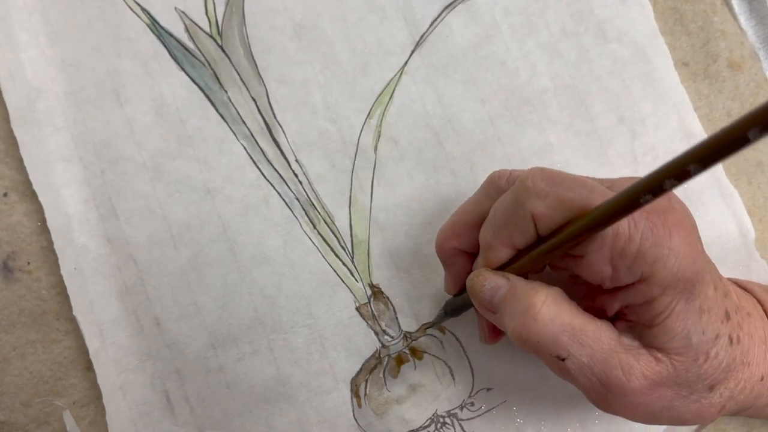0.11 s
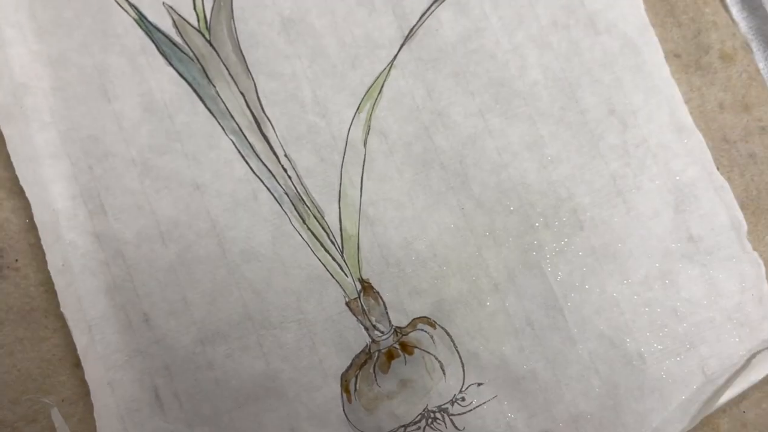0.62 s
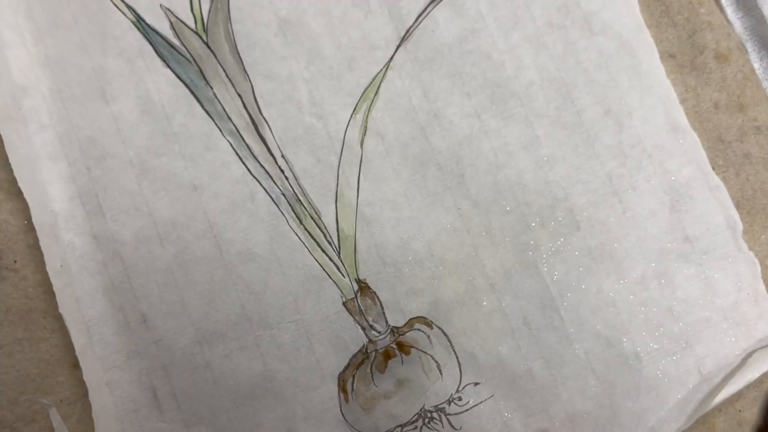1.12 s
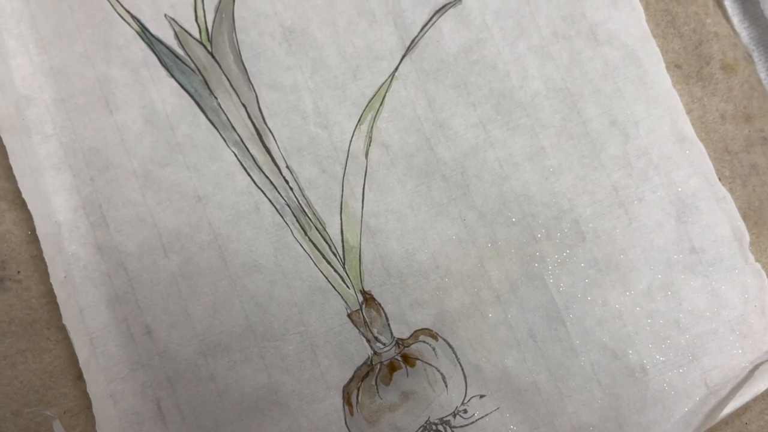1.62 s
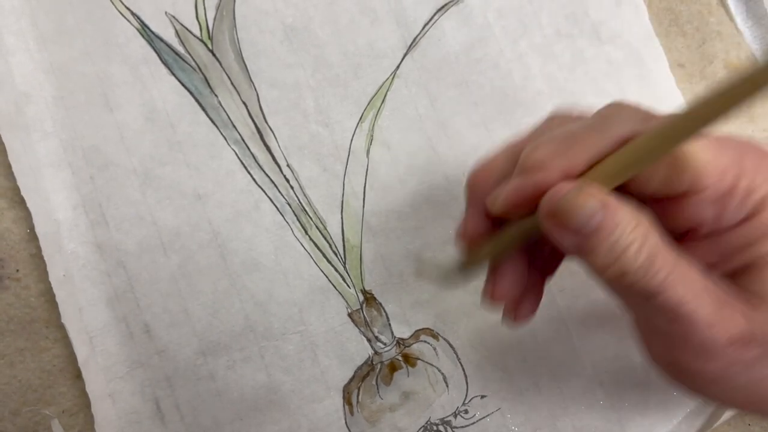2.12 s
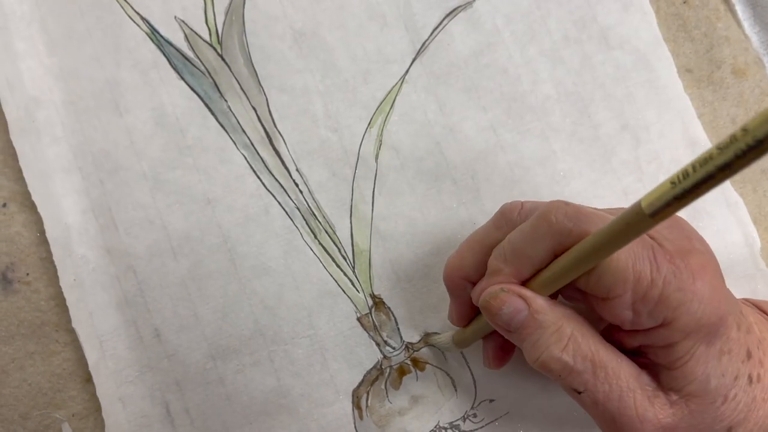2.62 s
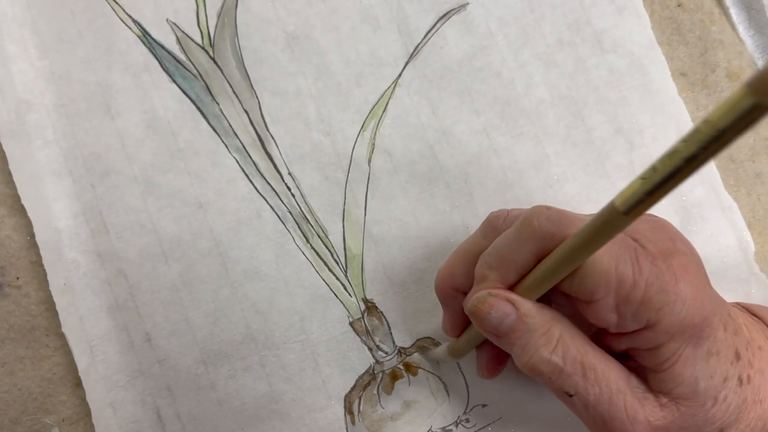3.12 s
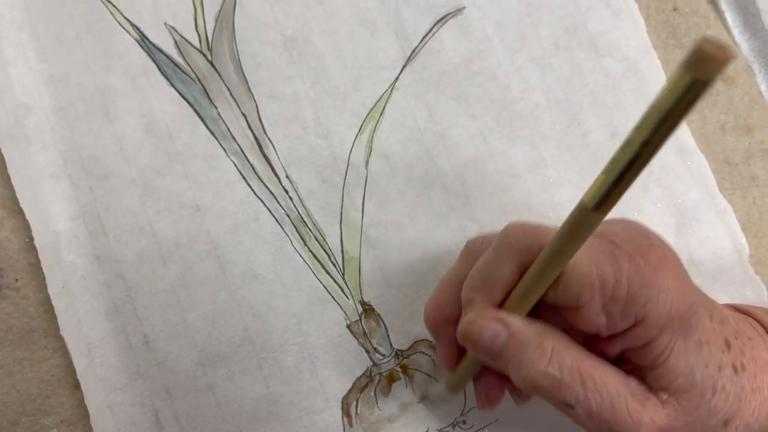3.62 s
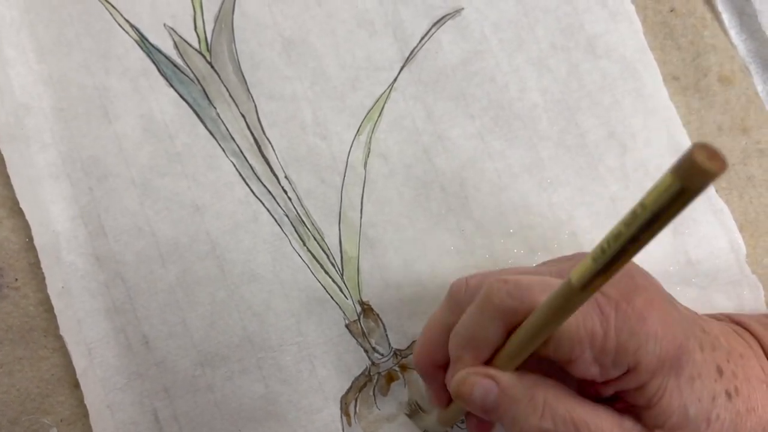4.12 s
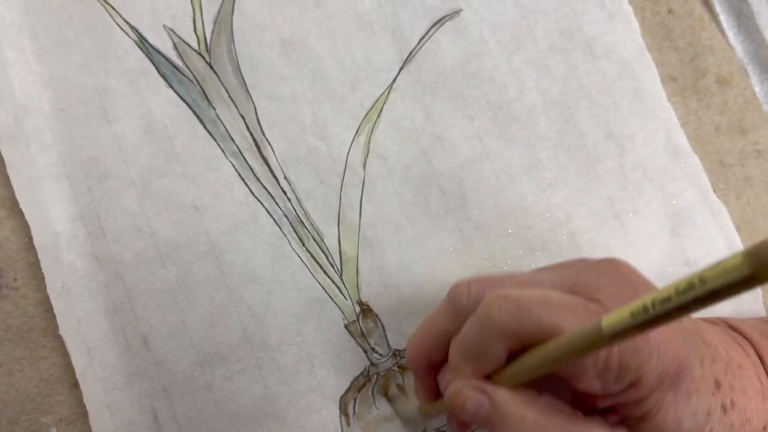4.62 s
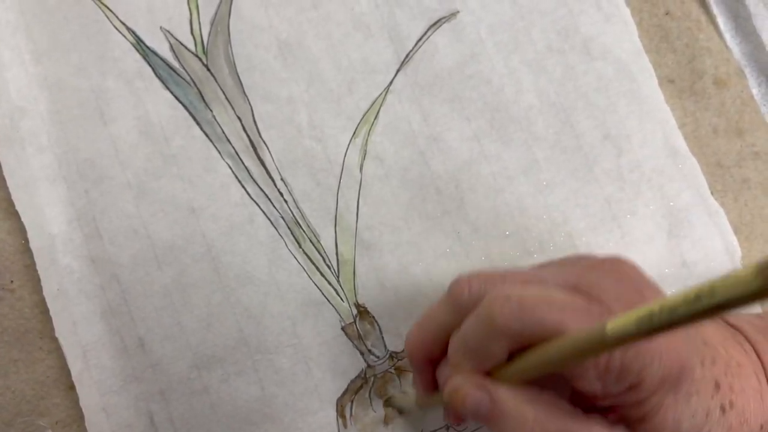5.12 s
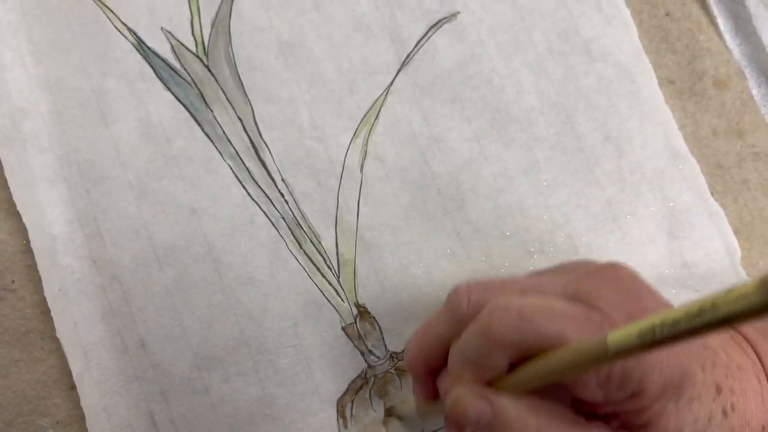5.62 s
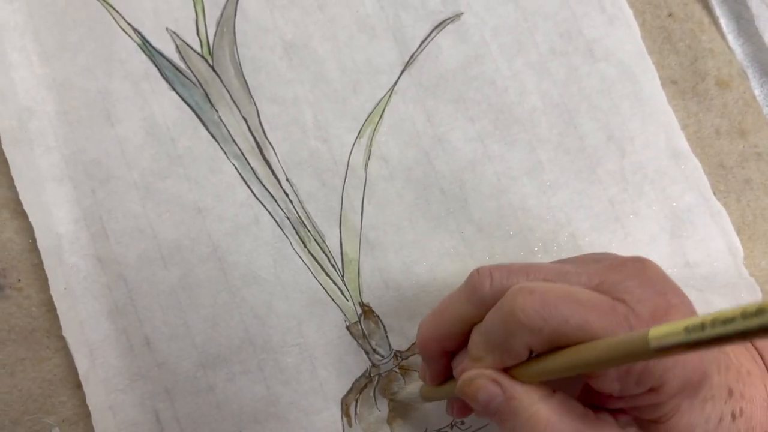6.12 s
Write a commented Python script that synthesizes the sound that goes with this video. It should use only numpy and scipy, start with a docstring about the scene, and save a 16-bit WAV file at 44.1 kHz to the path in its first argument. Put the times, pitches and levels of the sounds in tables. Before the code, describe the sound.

Close, quiet paper rubbing and bristle strokes over a faint low drone, interrupted early by a sharp clack of wooden brush handles.

```python
"""A quiet room with a low distant drone, at a table covered with paper.
A wooden brush handle drops among others and clatters: rough contacts ring wood and table modes.
Before, during and after the clatter a soft brush dabs and scrubs the paper while the hand slides along:
coloured noise in swelling strokes. Heard close by a small camera whose two microphone ports turn the
treble against each other."""
import sys
import numpy as np
from scipy import signal
from scipy.fft import rfft, irfft, next_fast_len
from scipy.io import wavfile
from scipy.ndimage import uniform_filter1d

SR = 44100
rng = np.random.default_rng(int(sys.argv[2]) if len(sys.argv) > 2 else 0)


def makeup_ratio(level_db):
    """Linear amplitude ratio for a level in decibels (20 dB per factor of ten)."""
    decades = np.asarray(level_db, float) / 20
    return 10 ** decades


def to_wav(sig):
    """Store sig (one row per channel, or 1-D mono) as 16-bit WAV at the path in sys.argv[1].

    Samples outside -1..1 are clipped; the rate is SR.
    """
    pcm = np.clip(np.atleast_2d(sig), -1, 1) * 32767
    pcm = np.round(pcm).astype(np.int16)
    wavfile.write(sys.argv[1], SR, pcm.T)  # frames by channels


N = 275889

# spectrum shape of the room air: (frequency [Hz], density [dB per Hz])
ROOM_AIR = [(15, -37), (25, -2), (71, 3), (436, -23.5), (1000, -26), (1770, -19.5), (2620, -28.5),
            (7200, -35), (8640, -25), (9340, -31.5), (10100, -37.5), (11200, -31), (12400, -52),
            (16200, -76), (22000, -120)]
# how fast each band of the echo dies: (frequency [Hz], t60 [s])
ECHO_DECAY = [(150, 0.73), (600, 0.62), (2500, 0.31), (8000, 0.17), (12000, 0.048)]
# arm and sleeve shifting on the table: (middle [s], length [s], level [dB])
ARM_BUMPS = [(0.276, 0.346, -56), (0.803, 0.876, -61.5), (1.531, 0.457, -59.5), (1.931, 0.226, -60.5),
             (2.145, 0.253, -55), (2.914, 0.065, -59.5), (3.484, 0.5, -68.5), (4.9, 0.385, -67),
             (5.32, 0.312, -63.5), (5.952, 0.227, -65.5)]
# distant drone: (time [s], level [dB], level of the fifth above [dB])
DRONE_LEVELS = [(0.0, -69, -71.5), (0.72, -68.5, -68.5), (0.85, -54, -55.5), (1.34, -67, -79.5),
                (1.98, -54.5, -67.5), (2.39, -65, -66), (2.6, -52.5, -77), (2.69, -61.5, -66.5),
                (3.17, -48.5, -56.5), (3.22, -54, -75.5), (3.45, -55.5, -55.5), (3.68, -60, -69),
                (4.2, -81, -74), (4.5, -100, -100)]
# low hum beside the drone: (time [s], frequency [Hz], level [dB])
LOW_HUM = [(0.0, 57, -67.5), (0.89, 56.1, -60.5), (1.34, 54.8, -62.5), (4.74, 56.05, -68),
           (4.93, 62.43, -60), (5.92, 60.95, -61.5), (6.12, 58.53, -49.5), (6.19, 58.6, -68),
           (6.26, 60.8, -66)]
# the hand lands on the sheet: (time [s], starting level [dB], t60 [s], centre [Hz])
SCUFFS = [(.695, -56, 0.084, 1698), (2.168, -58.5, .2, 1300), (2.895, -58.5, .1, 598),
          (4.415, -57.5, 0.27, 800), (5.917, -52, 0.141, 1087), (6.01, -55, 0.168, 1002),
          (6.127, -62, .22, 800)]
# fingertip taps on the sheet: (time [s], peak [dB], pitch [Hz])
TAPS = [(.192, -46.5, 1150), (.697, -38.5, 1675), (1.413, -53.5, 1440), (1.529, -38, 1720),
        (2.19, -36.5, 1788), (2.2109, -35, 1630), (2.3336, -36.5, 1408), (2.344, -42.5, 1750),
        (3.423, -41.5, 1670), (3.721, -46, 1480), (4.231, -47, 950), (4.241, -44, 1440), (4.688, -48, 1850),
        (5.9, -50.5, 1740)]
# table top modes: (frequency [Hz], relative level [dB], t60 [s])
TABLE_MODES = [(133.5, -15, 0.2), (218, -5.5, 0.094), (336.5, 1.5, .06), (430.2, -1.5, 0.0447),
               (523.1, -0.5, .05), (648.8, -1, .045), (800, -4.5, .04), (1022, -10.5, 0.02)]
# the table answers the knocks: (time [s], peak [dB])
THUDS = [(.8406, -29), (.8428, -24), (.8714, -30.5), (0.8787, -37), (.888, -32.5), (.903, -37), (.924, -34)]
# wooden handle modes: (frequency [Hz], relative level [dB], t60 [s])
HANDLE_MODES = [(1150, -12.5, .01), (1523, -10, .015), (1850, -10.5, 0.0072), (2415, -5.5, 0.01638),
                (3065, -6.5, 0.011), (3593, -5, .009), (4413, -0.5, 0.014), (5050, -8, .007),
                (5694, -11, 0.0055), (6770, -9, 0.014), (8175, 1, 0.0059), (9300, 0.5, 0.0045),
                (10357, 2.48, 0.0059), (11215, -2, 0.0058), (12600, -10, 0.0032)]
# loose handles chatter, one row: (start [s], end [s], tick rate [1/s], tick level [dB],
# fading [dB/s], low modes against high [dB])
RATTLE = (.839, 0.9155, 2500, -33, 142, -5.5)
# handle knocks: (time [s], peak of the high modes [dB], brightest frequency [Hz],
# peak of the low modes against the high [dB])
KNOCKS = [(.613, -47, 8340, -26.5), (0.8371, -2, 8720, -25), (0.8381, -2, 8700, -22.5),
          (0.8406, 2, 9300, -20.5), (0.8421, -4, 10990, -19), (0.8433, -7, 9600, -13),
          (0.8454, -16, 10990, -4.5), (0.8506, -16.5, 9500, -11.5), (0.8711, -3, 10500, -19),
          (0.8749, -4, 10490, -16), (0.8786, -9.5, 7683, -11), (0.8875, -15.5, 9520, -6),
          (0.8902, -22, 7710, -4), (0.9015, -20, 7920, -13), (0.9063, -26, 7850, -12.5),
          (0.9167, -26.5, 7960, -10.5), (0.9233, -26.5, 8300, -3), (0.9277, -30, 6900, -6),
          (1.095, -36, 10900, -15), (1.102, -28.5, 6795, -10), (1.282, -40, 8050, -11.5),
          (1.6237, -33, 11000, -28), (5.863, -29.5, 10070, -22.5), (6.091, -45.5, 10480, -20)]
# spectrum shape of the bristle hiss: (frequency [Hz], density [dB per Hz])
BRISTLE_HISS = [(1800, -20.5), (2800, -6.5), (4000, -7.5), (6000, -8.5), (7500, -8.5), (9000, -3),
                (10200, -1), (11300, -2.5), (12000, -20.5), (12800, -34.5)]
# resonance of the sheet, one row: (centre [Hz], width [Hz])
SHEET_RESONANCE = (1622, 1202)
# resonance of the table under the hand, one row: (centre [Hz], width [Hz])
PALM_RESONANCE = (808.2, 530)
# brush strokes: (middle [s], length [s], bristle hiss [dB], sheet rustle [dB], palm drag [dB])
STROKES = [(0.094, 0.099, -66, -65, -79.5), (0.199, 0.215, -62.5, -62.5, -72.5),
           (0.323, .1, -67.5, -66, -70), (0.473, 0.155, -68.5, -69.5, -62.5),
           (0.634, 0.08, -61.5, -73.5, -61.5), (0.714, 0.112, -64, -61, -66),
           (0.821, 0.182, -61.5, -59, -56.5), (0.961, 0.237, -62.5, -60.5, -64.5),
           (1.101, 0.1286, -58.5, -61, -64.5), (1.188, 0.065, -64.5, -71.5, -64.5),
           (1.272, 0.123, -61.5, -67.5, -65), (1.368, 0.118, -71.5, -75.5, -80.5),
           (1.465, 0.159, -60.5, -55.5, -64.5), (1.555, 0.126, -57, -59.5, -59.5),
           (1.623, 0.159, -53.5, -65.5, -71.5), (1.759, 0.24, -57.5, -62, -68),
           (1.848, 0.147, -60, -74.5, -80), (1.936, 0.185, -76, -66, -68.5),
           (2.076, .07, -68, -84.5, -76.5), (2.216, 0.1305, -58.5, -61.5, -60.5),
           (2.275, 0.124, -62, -61, -65.5), (2.353, 0.169, -59, -58, -65.5),
           (2.498, 0.243, -63.5, -60.5, -67), (2.663, 0.165, -66.5, -64.5, -74),
           (2.806, 0.141, -61, -62.5, -76.5), (2.873, 0.124, -51.5, -51.5, -63),
           (3.012, 0.127, -61.5, -60, -69.5), (3.183, 0.2, -56.5, -57.5, -76),
           (3.292, 0.165, -57.5, -59.5, -69), (3.453, 0.1696, -54.5, -55, -59),
           (3.612, 0.1016, -54, -54.5, -75), (3.751, 0.1407, -54, -56, -72.5),
           (3.889, 0.082, -56, -56.5, -84), (4.018, 0.1295, -50, -53.5, -74.5),
           (4.152, 0.144, -56, -56.5, -81), (4.283, 0.1715, -53.5, -52, -64.5),
           (4.437, 0.1193, -57, -52.5, -63.5), (4.566, 0.1475, -53.5, -56, -68),
           (4.723, 0.108, -54.5, -56, -67), (4.863, 0.1814, -52, -52.5, -63),
           (4.985, 0.173, -53, -51.5, -54.5), (5.153, 0.1795, -50.5, -52.5, -56.5),
           (5.271, 0.1395, -53, -51, -50.5), (5.392, 0.1156, -50, -51.5, -53.5),
           (5.509, 0.108, -54, -52, -56), (5.628, 0.107, -50.5, -54, -66), (5.745, 0.1093, -55, -58.5, -67),
           (5.937, 0.0824, -69.5, -67, -62), (6.036, 0.078, -61.5, -60.5, -58.5),
           (6.153, 0.198, -62.5, -65.5, -63), (6.26, 0.151, -54, -58, -61.5)]
# swishes of the finest hiss alone: (middle [s], length [s], level before the fine hiss boost [dB])
SWISHES = [(0.471, 0.168, -67.5), (0.623, 0.0575, -58), (1.097, 0.0775, -58), (1.197, 0.057, -64.5),
           (1.589, 0.084, -62), (1.636, 0.0726, -49), (1.776, .16, -56.5), (2.076, .06, -70.5),
           (5.89, .1, -67.5)]
# microphone ports: (frequency [Hz], likeness [0-1], lead of the right [rad], left over right [dB])
PORTS = [(60, .94, 0, 3.6), (300, .65, 0, 1.2), (1400, .35, .3, .5), (2300, .6, -.7, 3),
         (4000, .75, -.6, 3), (6000, .45, -.5, 2.5), (7200, .6, -.6, 2.5), (8000, 1, -.6, .4),
         (8600, 1, .1, 0), (10250, 1, 3.14, 0), (11500, 1, 5.9, 0), (11900, 1, 6.28, 0)]


def evened(x):
    """Scales to rms 1."""
    return x / np.sqrt(np.mean(x ** 2) + 1e-30)


def read(points, hz):
    """Columns of a table at the given frequencies, joined on a log frequency axis."""
    f, *columns = np.transpose(points)
    return [np.interp(np.log(hz + 1), np.log(f + 1), c) for c in columns]


def follow(rows):
    """Columns of a time curve at every sample."""
    s, *columns = np.transpose(rows)
    return [np.interp(np.arange(N) / SR, s, c) for c in columns]


def colour(x, gain):
    """Filters by a gain given as a function of frequency."""
    size = next_fast_len(N + 4096)
    return irfft(rfft(x, size) * gain(np.fft.rfftfreq(size, 1 / SR)), size)[..., :N]


def hump(centre_hz, width_hz, steep):
    """Gain curve of a resonance."""
    return lambda hz: (1 + ((hz - centre_hz ** 2 / (hz + 1)) / width_hz) ** 2) ** -steep


def grit(per_s, spread_db, patchy_db):
    """Noise with dense snags of uneven size, shared by both sound paths, in drifting patches of colour."""
    snags = makeup_ratio(spread_db * np.minimum(rng.exponential(1, N), 4)) * (rng.random(N) < per_s / SR)
    noise = (0.34 + snags) * rng.standard_normal((2, N))
    hz, t, z = signal.stft(noise, SR, nperseg=256, noverlap=192)
    patches = uniform_filter1d(rng.standard_normal((len(t), len(hz))), 24, axis=0)
    patches = uniform_filter1d(patches, 5, axis=1)
    z = z * makeup_ratio(patchy_db * evened(patches).T)
    return signal.istft(z, SR, nperseg=256, noverlap=192)[1][:, :N]


def swells(middle_s, length_s, db):
    """Gain over time of events that swell and die by one shape, summed in power."""
    edge_db, squareness = -16, 1.83  # level at both ends; 2 = bell, more = flat top
    t = np.arange(0, N + 64, 64) / SR
    away = np.abs(2 * (t[:, None] - middle_s) / length_s)
    power = makeup_ratio(2 * np.maximum(db + edge_db * away ** squareness, -200)).sum(1)
    return np.interp(np.arange(N) / SR, t, np.sqrt(power))


def add(mix, s, sound):
    """Mixes a sound in at s seconds."""
    part = mix[:, round(s * SR):][:, :sound.shape[1]]
    part += sound[:, :part.shape[1]]


def ring(modes, detune, seconds, rise_ms):
    """Dying modes with a soft start, one a row."""
    hz, db, t60 = np.transpose(modes)[:, :, None]
    t = np.arange(round(seconds * SR)) / SR
    rise = np.sin(np.pi / 2 * np.minimum(1000 * t / rise_ms, 1)) ** 2
    return rise * makeup_ratio(db - 60 * t / t60) * np.sin(2 * np.pi * hz * detune * t)


def room_air():
    """Steady, slightly patchy noise in the colour of the room."""
    air = colour(grit(22000, 0.74, 3.0), lambda hz: makeup_ratio(read(ROOM_AIR, hz)[0]))
    return makeup_ratio(-59) * evened(air)


def tone(hz, db, waver_db):
    """A low sine whose level wavers slowly at random."""
    waver = evened(uniform_filter1d(uniform_filter1d(rng.standard_normal(N), 3000), 3000))
    turns = np.cumsum(hz) / SR + rng.random()
    return np.sqrt(2) * makeup_ratio(db + waver_db * waver) * np.sin(2 * np.pi * turns)


def drone():
    """A distant tone and its fifth sag in pitch and fade away, beside a wandering low hum."""
    hz = 84.62 - 1.3 * np.arange(N) / SR  # sags by 1.3 Hz per second
    db, fifth_db = follow(DRONE_LEVELS)
    return tone(hz, db, 0.996) + tone(hz * 3 / 2, fifth_db, 2.4) + tone(*follow(LOW_HUM), 2.5)


def arm():
    """Arm and sleeve shift on the table: dull coarse noise that swells over a faint bed."""
    rest_db = -72.5
    gain = np.hypot(makeup_ratio(rest_db), swells(*np.transpose(ARM_BUMPS)))
    return gain * evened(colour(grit(320, 3.4, 3), hump(198.5, 280, 1.1)))


def echo(x):
    """Room echo of the hits: a noise tail whose bands die at their own speed."""
    hz, t, z = signal.stft(rng.standard_normal((2, SR // 2)), SR, nperseg=256)
    dying = makeup_ratio(-60 * t / read(ECHO_DECAY, hz)[0][:, None])
    tail = signal.istft(z * dying, SR, nperseg=256)[1]
    tail[:, :130] = 0  # first reflection comes after 3 ms
    return makeup_ratio(-18) * signal.fftconvolve(x, tail / np.linalg.norm(tail[0]), axes=1)[:, :N]


def scuffs():
    """The hand lands on the sheet: coarse noise that starts at once and dies away."""
    noise, out = grit(1500, 3.1, 1.92), np.zeros((2, N))
    t = np.arange(SR // 4) / SR
    for s, db, t60, hz in SCUFFS:
        rubbed = colour(noise, hump(hz, 1.39 * hz, 1.206))
        piece = evened(rubbed[:, round(s * SR):][:, :len(t)])
        fade = np.minimum(t / 0.0074, 1) * makeup_ratio(db - 60 * (t / t60) ** 1.7)
        add(out, s, piece * fade[:piece.shape[1]])
    return out


def taps():
    """Each fingertip tap is a few cycles of the sheet, a quarter turn apart on the two paths."""
    out, cycles = np.zeros((2, N)), 3.5
    for s, db, hz in TAPS:
        turns = np.arange(round(cycles / hz * SR)) * hz / SR
        pulse = np.sin(np.pi * turns / cycles) ** 2
        waves = np.array([np.sin(2 * np.pi * turns), np.cos(2 * np.pi * turns)])
        add(out, s, makeup_ratio(db) * pulse * waves)
    return out


def thuds():
    """Dull modes of the table top, a little different along each sound path."""
    out = np.zeros((2, N))
    shifts = rng.standard_normal((len(THUDS), 2, len(TABLE_MODES), 1))
    for (s, db), shift in zip(THUDS, shifts):
        thud = np.array([ring(TABLE_MODES, 1 + 0.092 * path, .25, 1.4).sum(0) for path in shift])
        add(out, s, makeup_ratio(db) * thud / np.abs(thud).max())
    return out


def rattle():
    """Loose handles chatter: many tiny random ticks ring the wood and fade as the handles settle."""
    start, end, per_s, db, fade_db, low_db = RATTLE
    t = np.arange(round((end - start) * SR)) / SR
    uneven_db = 3.5 * np.minimum(rng.exponential(1, len(t)), 2.5)
    size = makeup_ratio(db - fade_db * t + uneven_db) * (rng.random(len(t)) < per_s / SR)
    ticks = np.convolve(size, signal.windows.hann(16))[:len(t)] * rng.standard_normal((2, len(t)))
    balance = makeup_ratio(low_db * (np.transpose(HANDLE_MODES)[0] < 6000))
    handle = balance @ ring(HANDLE_MODES, 0.9975, .05, .3)
    out = np.zeros((2, N))
    add(out, start, signal.fftconvolve(ticks, handle[None] / np.linalg.norm(handle), axes=1))
    return out


def knocks():
    """A short rough contact rings the handle, its high and low modes levelled apart."""
    contact_ms = 0.688
    out, mode_hz, count = np.zeros((2, N)), np.transpose(HANDLE_MODES)[0], len(HANDLE_MODES)
    chance = rng.standard_normal((len(KNOCKS), 3, 128))
    t = np.arange(128) / SR
    contact = np.sin(np.pi * np.minimum(t / (contact_ms / 1000), 1)) ** 2
    for (s, db, bright_hz, low_db), (*rough, shift) in zip(KNOCKS, chance):
        modes = ring(HANDLE_MODES, 1 + 0.017 * shift[:count, None], .05, 0.326)  # each blow lands elsewhere
        modes *= makeup_ratio(2.9 * shift[40:40 + count, None])  # and favours other modes
        high = hump(bright_hz, 4200, 1.1)(mode_hz) * (mode_hz > 6000) @ modes
        low = (mode_hz < 6000) @ modes
        for part, part_db in ((high, db), (low, db + low_db)):
            wood = signal.fftconvolve(rough * contact, part[None], axes=1)
            add(out, s, makeup_ratio(part_db) * wood / np.abs(wood).max(1, keepdims=True))
    return out


def bristles():
    """Bristles hiss in each stroke; the finest hiss needs speed, so it grows faster than the rest."""
    fine_db, fine_length = -6.5, 0.84  # dB under the hiss before the boost, share of the stroke length
    fine_slope, full_db = .4, -54  # extra dB per dB of hiss, counted from a full stroke
    fine_boost_db = 4.5
    s, length, hiss_db = np.transpose(STROKES)[:3]
    stroke_db = hiss_db + fine_db + fine_slope * (hiss_db - full_db)
    fine_gain = np.hypot(swells(s, fine_length * length, stroke_db), swells(*np.transpose(SWISHES)))
    hiss = colour(grit(9000, 1.5, 2.7),
                  lambda hz: makeup_ratio(read(BRISTLE_HISS, hz)[0]) * (hz > 900) * (hz < 13500))
    body = colour(hiss, lambda hz: 1 / (1 + (hz / 9600) ** 16))
    fine = hiss - body
    return swells(s, length, hiss_db) * evened(body) + fine_gain * makeup_ratio(fine_boost_db) * evened(fine)


def rubbing():
    """Bristles hiss, the sheet rustles and the palm drags, each with its own snags and colour."""
    s, length, _, sheet_db, palm_db = np.transpose(STROKES)
    hiss = bristles()
    sheet = evened(colour(grit(3000, 1.8, 3.1), hump(*SHEET_RESONANCE, 1.156)))
    palm = evened(colour(grit(2000, 3, 3.5), hump(*PALM_RESONANCE, 0.91)))
    # rustle and drag outlast the hiss a little
    rustle = swells(s, 1.054 * length, sheet_db) * sheet
    drag = swells(s, 1.231 * length, palm_db) * palm
    return hiss + rustle + drag


def scene():
    """Two sound paths to the camera: the direct one and an unrelated one off the table."""
    hits = knocks() + thuds() + rattle() + taps()
    foreground = hits + echo(hits) + rubbing() + scuffs()
    background = room_air() + arm() + drone()
    return foreground + background


def top_cut(x):
    """Nothing passes above the cut-off."""
    return signal.sosfilt(signal.butter(12, 12580, fs=SR, output="sos"), x)


def record(dry):
    """The right port hears a blend of both paths, turned in phase; the loudest knocks overload."""
    def like(hz):
        return np.clip(read(PORTS, hz)[0], 0, 1)

    def turn(hz):  # half of the phase and level offset; the left takes the inverse
        _, lead, left_db = read(PORTS, hz)
        return np.exp(.5j * lead) / makeup_ratio(left_db / 2)

    dry = colour(dry, lambda hz: 1 / np.sqrt(1 + (38 / (hz + 1)) ** 6))  # the capsule loses the deepest bass
    left = colour(dry[0], lambda hz: 1 / turn(hz))
    shared = colour(dry[0], lambda hz: like(hz) * turn(hz))
    unrelated = colour(dry[1], lambda hz: np.sqrt(1 - like(hz) ** 2) * turn(hz))
    mix = np.clip([left, shared + unrelated], -1, 1)
    return top_cut(mix)


dry = scene()
out = record(dry)
to_wav(out)
```